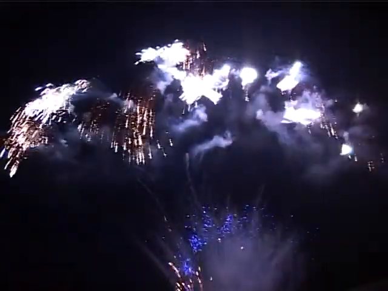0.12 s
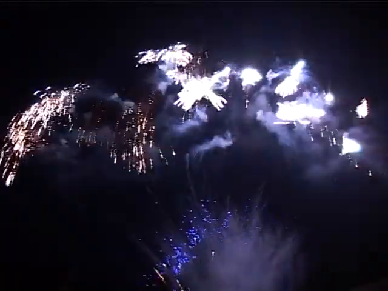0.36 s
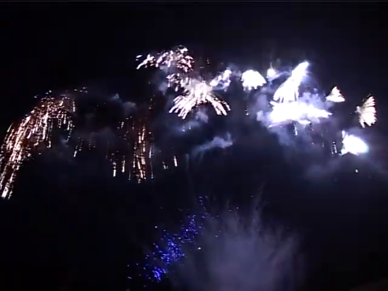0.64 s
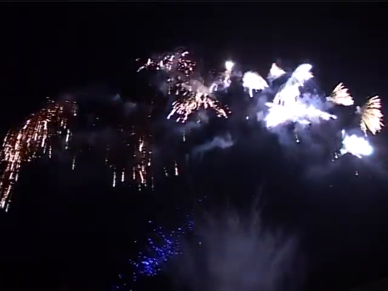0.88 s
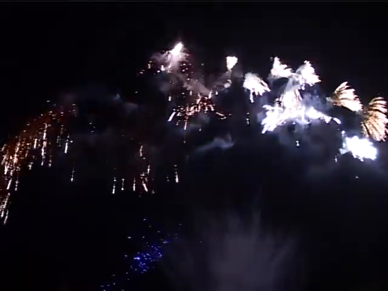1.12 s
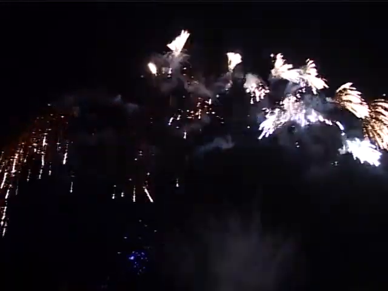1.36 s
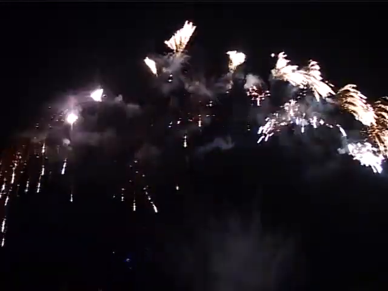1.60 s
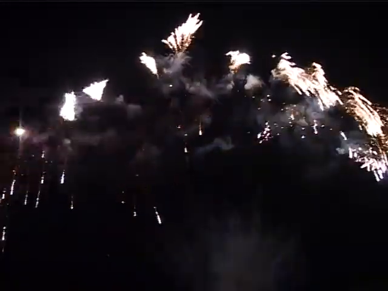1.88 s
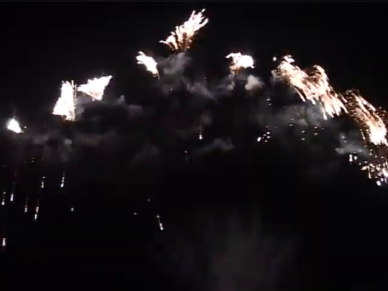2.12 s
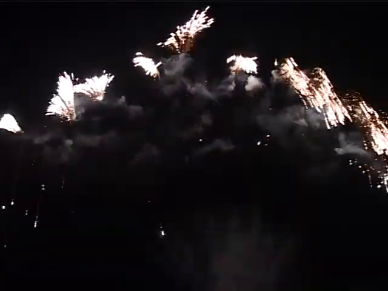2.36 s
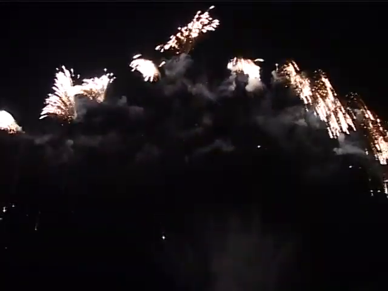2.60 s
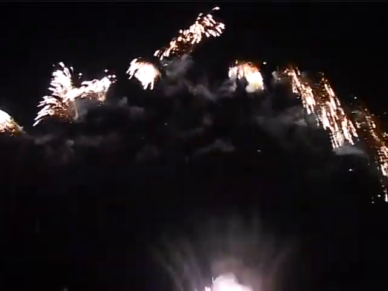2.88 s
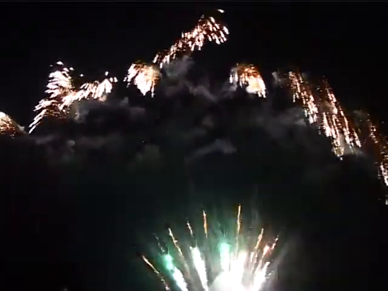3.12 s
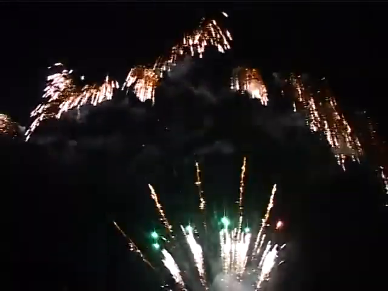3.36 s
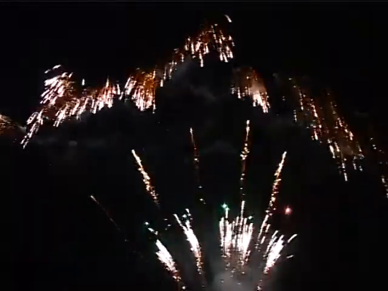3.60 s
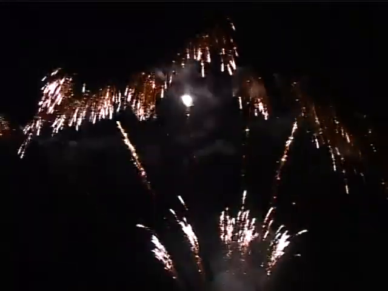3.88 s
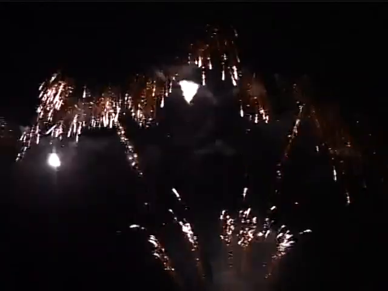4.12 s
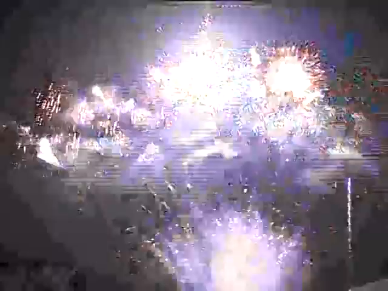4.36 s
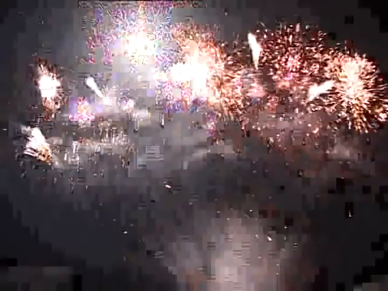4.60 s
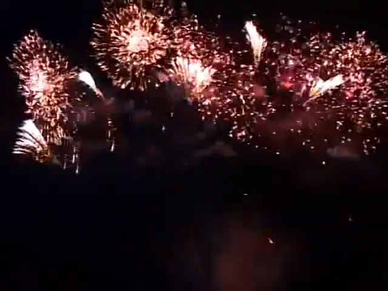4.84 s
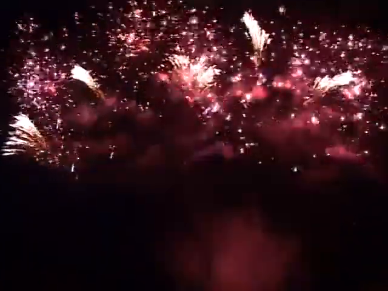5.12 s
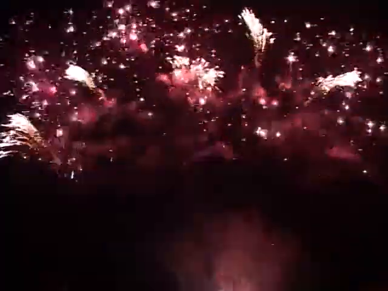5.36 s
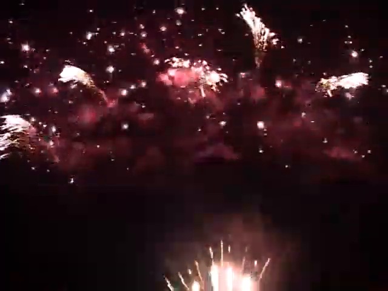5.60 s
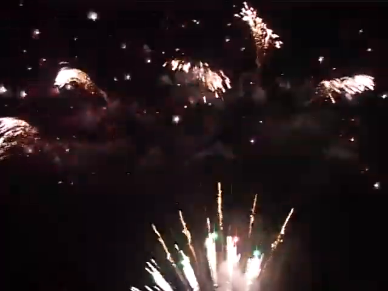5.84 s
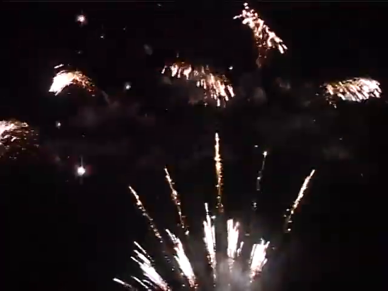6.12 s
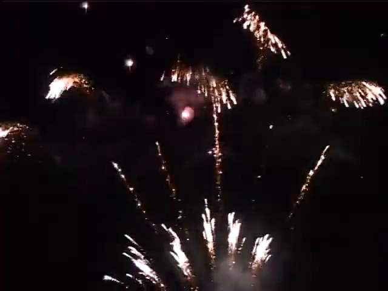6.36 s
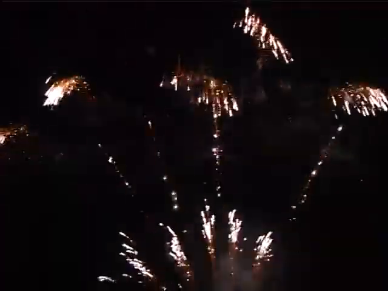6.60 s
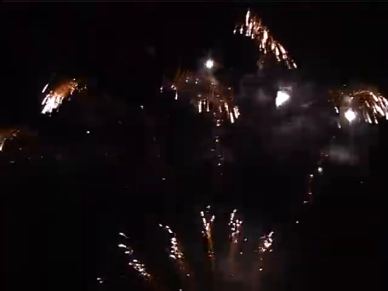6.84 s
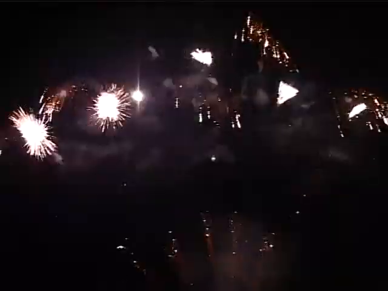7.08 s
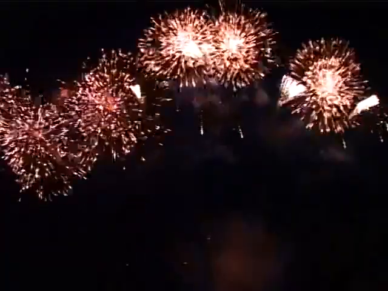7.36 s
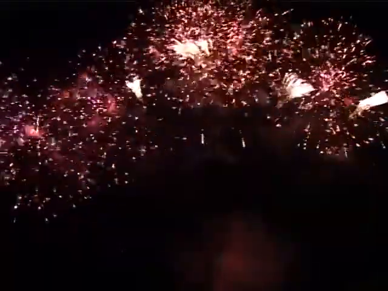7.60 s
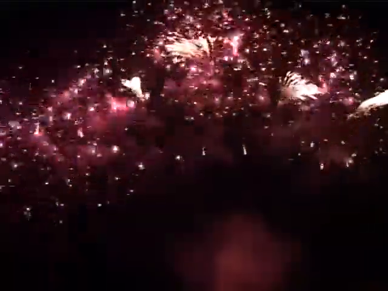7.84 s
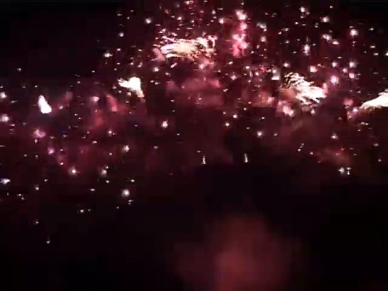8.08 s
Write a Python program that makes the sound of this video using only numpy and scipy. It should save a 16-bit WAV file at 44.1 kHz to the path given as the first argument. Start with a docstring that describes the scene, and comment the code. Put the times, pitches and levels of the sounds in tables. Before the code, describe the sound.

Firework cake outdoors fires boomy launch shots and, later, bursts of overloaded sharp explosions, thunderous echoes rolling between thin crackles and uneven hiss.

```python
"""A firework cake fires at night: single lift shots and two volleys leave the tubes, then clusters of salutes overhead
overload the input. Each bang is a damped pressure swing with a ground bounce, a near echo field and far rolling
returns, both made of filtered sparse noise. Small cracks and ragged pops, mostly in the air, sputter ahead of lifts
and an uneven hiss fill in around them. One capsule hears it all through a resonant housing."""
import sys
import numpy as np
from scipy import signal
from scipy.io import wavfile
from scipy.ndimage import uniform_filter1d, minimum_filter1d

SR = 44100
rng = np.random.default_rng(int(sys.argv[2]) if len(sys.argv) > 2 else 0)


def wav_record(signal):
    """Record a signal, one row per channel, as 16-bit PCM in the file named by sys.argv[1]."""
    frames = np.transpose(np.atleast_2d(signal))
    bounded = np.clip(frames, -1, 1)
    # unit amplitude maps onto the largest positive 16-bit level
    quanta = np.round(bounded * 32767).astype(np.int16)
    wavfile.write(sys.argv[1], SR, quanta)


def volts_from_decibels(level):
    """Turn decibel levels (scalar or array-like) into linear amplitude factors."""
    exponent = np.asarray(level, float) / 20
    return 10 ** exponent


N = 362502  # samples, about 8.2 s

# lift shots from the tubes: t/s, blast level/dB, near echo field level/dB, pitch factor of the ring
LIFT_SHOTS = [(-.052, -3.5, -26, 0.64), (0.1542, 2, -23, 0.88), (.3799, 3, -21.5, 0.81),
              (3.03, 5, -13.5, 0.95), (3.0366, 3, -19.5, 0.9), (3.0426, 0.5, -24, 0.92),
              (3.0562, -19, -20.5, 0.54), (5.6245, 4, -14.5, 1.01), (5.6398, -14, -19.5, 0.92),
              (5.648, -10, -18.5, 1.14), (5.6623, -18, -21, 1.01)]
# salutes overhead: t/s, blast level/dB, near echo field level/dB, delay of the ground bounce/ms
SALUTE_BURSTS = [(4.6184, 16.5, -9.5, 5), (4.738, -14, -17, 3.6), (4.7654, 19, -15.5, 4.7),
                 (4.7894, 14, -10, 4.5), (4.9253, 15.5, -11.5, 4.66), (4.9981, 15, -11.5, 6.2),
                 (7.3907, 27, -10, 4.36), (7.408, 11, -11, 4.52), (7.5494, 19.5, -13.5, 5.5),
                 (7.5625, 17, -14, 4.44), (7.5862, 9.5, -11, 6.3)]
# colour of the near echoes of salutes, cracks and pops: f/Hz, relative level/dB
BURST_ECHO_COLOUR = [(24, -54), (40, -20), (93, -7), (211, -1.5), (373, -2), (627, -13), (933, -8),
                     (1170, -19.5), (2170, -26.5), (2450, -26), (5850, -34.5), (6950, -41.5),
                     (11400, -42.5), (13600, -52), (15000, -114)]


def read(points, hz):
    """Joins a table by straight lines over log frequency."""
    f, value = np.transpose(points)
    return np.interp(np.log(hz + 1), np.log(f + 1), value)


def add(mix, s, sound):
    """Mixes a sound in at second s; what lies before the start is lost."""
    at = round(s * SR)
    part = mix[max(at, 0):max(at + len(sound), 0)]
    part += sound[max(-at, 0):][:len(part)]


def causal(db):
    """Minimum-phase filter taps for a gain given from zero to half the sample rate."""
    mirrored_db = np.r_[db, db[-2:0:-1]]
    log_gain = np.log(volts_from_decibels(np.maximum(mirrored_db, -100)))
    spectrum = np.exp(np.conj(signal.hilbert(log_gain)))
    return np.fft.ifft(spectrum).real[:len(db) // 2]


def colour(x, points):
    """Filters x by a spectrum, keeping the power of white noise."""
    taps = causal(read(points, np.fft.rfftfreq(8192, 1 / SR)))
    return signal.oaconvolve(x, taps / np.linalg.norm(taps))[:len(x)]


def swing(hz, start, cycles, rise_ms, slow_s=1):
    """A pressure jump, then suction and rebound: a damped cosine whose later swings stretch; start in radians."""
    t = np.arange(SR // 24) / SR
    turns = hz * slow_s * (1 - np.exp(-t / slow_s))
    rise = 1 - np.exp(-1000 * t / rise_ms)
    decay = np.exp(-hz * t / cycles)
    fade_out = 1 - (t / t[-1]) ** 4
    return rise * decay * fade_out * np.cos(2 * np.pi * turns + start)


def with_ground(mix, s, sound, echo_ms, echo_db, size=7):
    """The direct sound and its slightly duller bounce off the ground."""
    out = np.zeros(len(sound) + round(echo_ms * SR / 1000))
    add(out, 0, sound)
    smoothing = np.bartlett(size) * 2 / (size - 1)
    bounce = signal.lfilter(smoothing, 1, sound)
    add(out, echo_ms / 1000, volts_from_decibels(echo_db) * bounce)
    add(mix, s, out)
    return mix


def field(starts, levels_db, t60, build_s, echoes, taps_per_s, patchy_db):
    """Sparse reflections whose power builds after each bang and dies band by band."""
    hop = 128
    taps = rng.standard_normal(N) * (rng.random(N) < taps_per_s / SR)
    taps *= np.sqrt(SR / taps_per_s)
    hz, t, z = signal.stft(taps, SR, nperseg=4 * hop, noverlap=3 * hop)
    power = np.zeros(z.shape)
    slope_db = -60 / np.maximum(read(t60, hz), .1)[:, None]  # per second
    for s, db in zip(starts, levels_db):
        first = np.searchsorted(t, s + 0.002)
        age = t[first:] - s
        # echoes that stand out: quick to arrive, slower to fade
        late = [(np.maximum(age - delay, 0) / rise, lift) for delay, lift, rise in echoes]
        lumps_db = sum(lift * u * np.exp(1 - u) for u, lift in late)
        build = 1 - np.exp(-age / build_s)
        power[:, first:] += build * volts_from_decibels(2 * (db + lumps_db + slope_db * age))
    # uneven level, smoothed over time and then over frequency
    patches = uniform_filter1d(rng.standard_normal(z.shape), size=8, axis=1)
    patches = uniform_filter1d(patches, size=30, axis=0)
    z *= np.sqrt(power) * volts_from_decibels(patchy_db * patches / patches.std())
    return signal.istft(z, SR, nperseg=4 * hop, noverlap=3 * hop)[1][:N]


def night():
    """Burning stars hiss unevenly over the quiet of the night: steady sparse noise, coloured."""
    # colour of the hiss: f/Hz, relative level/dB
    hiss_colour = [(18, -38), (30, -3), (136, 7), (346, 0.5), (394, -2.5), (928, -2.5), (1440, -10),
                   (2770, -12.5), (3680, -15), (4200, -12), (6700, -23.5), (7830, -20), (9640, -24.5),
                   (13200, -30), (15000, -31)]
    # begun 5 s early, with almost no decay
    hiss = field([-5], [-56.5], [(1000, 1e4)], .1, [], taps_per_s=12000, patchy_db=1.0)
    return colour(hiss, hiss_colour)


def far_echoes():
    """Slow rolling returns from distant ground; an earlier shot still rolls at the start."""
    # decay of the far salute echoes: f/Hz, t60/s
    salute_far_decay = [(80, 5), (170, 4.9), (400, 7.86), (1000, 8.86), (3000, 5.04), (8000, 2.84)]
    # colour of the far salute echoes: f/Hz, relative level/dB
    salute_far_colour = [(24, -72), (40, -48), (76, -0.5), (227, 5), (355, -1.5), (554, -13), (956, -10.5),
                         (1290, -19.5), (2340, -24), (4560, -29.5), (6950, -36.5), (12300, -45),
                         (15000, -68)]
    # decay of the far shot echoes: f/Hz, t60/s
    shot_far_decay = [(80, 3.9), (170, 3.1), (400, 4.55), (1000, 3.94), (3000, 3.37), (8000, 3.3)]
    # colour of the far shot echoes: f/Hz, relative level/dB
    shot_far_colour = [(24, -58.5), (40, -21), (82, -16.5), (135, 2.5), (156, -4), (180, -19), (343, -9),
                       (514, -23), (869, -14.5), (1000, -21), (1500, -20), (4300, -32), (12000, -53.5),
                       (15600, -77), (22000, -120)]
    s, db = np.transpose(SALUTE_BURSTS)[[0, 2]]
    salute_roll = field(s, db - 16.0, salute_far_decay, 0.028, [], taps_per_s=8000, patchy_db=-1.0)
    rolling = colour(salute_roll, salute_far_colour)
    s, db = np.transpose([(-0.53, -6.5)] + [(row[0], row[2]) for row in LIFT_SHOTS])
    shot_roll = field(s, db - 24.5, shot_far_decay, .06, [], taps_per_s=9800, patchy_db=0.3)
    return rolling + colour(shot_roll, shot_far_colour)


def puff(noise, ms):
    """A few milliseconds of fizz: coloured noise that swells and dies."""
    # colour of the fizz: f/Hz, relative level/dB
    fizz_colour = [(120, -40), (200, -4.5), (946, -9.5), (1980, -18), (4310, -21), (7150, -35),
                   (11000, -40.5), (15000, -54)]
    u = 1000 * np.arange(len(noise)) / SR / max(ms, 1)
    return colour(noise, fizz_colour) * u ** 1.42 * np.exp(-1.8 * u ** 2) * 1.47


def sputter():
    """Quick match and escaping gas crackle ahead of the lifts, as short puffs of noise."""
    # sputter at the tubes: t/s, level/dB, length/ms
    sputter_puffs = [(0.1505, -13, 7), (3.0132, -16.5, 8.7), (3.0236, -9.5, 6.3), (5.61, -23, 5.9),
                     (5.618, -18, 6)]
    out = np.zeros(N)
    for (s, db, ms), noise in zip(sputter_puffs, rng.standard_normal((len(sputter_puffs), SR // 20))):
        add(out, s, volts_from_decibels(db) * puff(noise, ms))
    return out


def crack(hz):
    """A rounded shock: one deep dip between two small crests, with a thin snap."""
    u = np.arange(SR // 100) * hz / SR - 1  # in swings, zero at the dip
    dip = -np.cos(2 * np.pi * u - .25) * np.exp(-(u / .55) ** 2)
    snap = np.cos(2 * np.pi * 3.9 * (u + .4)) * np.exp(-((u + .3) / .3) ** 2)
    return dip + .14 * snap


def pops():
    """Clean cracks, and ragged puffs with a thump and a hollow knock; each bounces once, their echo field is faint."""
    # small clean cracks, mostly in the air, one just ahead of a volley: t/s, level/dB, swing f/Hz
    clean_cracks = [(1.095, -28, 960), (1.778, -41, 1000), (2.2330, -26.5, 925), (2.2489, -29, 920),
                    (3.013, -25, 1120), (4.5691, -26, 1260), (7.005, -31, 900), (7.2258, -35, 1000),
                    (7.344, -23, 1010)]
    # ragged pops, and at 0.054 s the echo of an earlier shot: t/s, level/dB, length/ms, knock f/Hz
    ragged_pops = [(0.028, -15.5, 3.7, 1700), (0.054, -12, 2.9, 729), (0.68, -23.5, 8.3, 870),
                   (0.994, -21.5, 6.4, 950), (1.01, -24.5, 5.1, 953), (1.344, -27.5, 4.8, 590),
                   (1.35, -20.5, 8.4, 875), (1.509, -29.5, 9.5, 765), (1.79, -20.5, 5.4, 610),
                   (1.923, -17, 6.2, 860), (2.254, -30.5, 4.8, 1150), (4.208, -17.5, 6, 950),
                   (4.392, -23, 5.5, 1660), (4.549, -22, 8.9, 880), (4.591, -22, 9.8, 760),
                   (7.023, -24, 5.9, 890), (7.207, -23, 5.6, 925), (7.237, -18, 6.4, 704),
                   (7.359, -33, 6.3, 870)]
    ground_ms, hollow = 4.9, 0.38  # hollow: share of the knock
    thump_db, thump_growth = 7.5, .6  # louder pops thump more (dB per dB)
    out = np.zeros(N)
    for s, db, hz in clean_cracks:
        with_ground(out, s, volts_from_decibels(db) * crack(hz), ground_ms, 0.46)
    for (s, db, ms, hz), noise in zip(ragged_pops, rng.standard_normal((len(ragged_pops), SR // 20))):
        fizz = puff(noise, ms)
        knock = signal.lfilter(*signal.iirpeak(hz, 3.5, SR), fizz)  # favours one pitch
        pop = (1 - hollow) * fizz + 2.2 * hollow * knock
        thump = swing(156, 2.8, cycles=0.73, rise_ms=0.39)
        add(pop, .0015, volts_from_decibels(thump_db + thump_growth * db) * thump)
        with_ground(out, s - .002, volts_from_decibels(db) * pop, ground_ms, -4)
    s, db = np.transpose([row[:2] for row in clean_cracks + ragged_pops])
    faint_decay = [(200, 0.22), (3000, 0.34)]  # f/Hz, t60/s
    faint = field(s, db - 21.5, faint_decay, 0.00082, [], taps_per_s=7300, patchy_db=1.5)
    return out + colour(faint, BURST_ECHO_COLOUR)


def bangs(rows, blast, echo_ms, echo_db, size, tint, t60, echoes):
    """Shock fronts with their ground bounce, and the near echo field that they raise."""
    out = np.zeros(N)
    for (s, db, *_), ms in zip(rows, echo_ms):
        with_ground(out, s, volts_from_decibels(db) * blast, ms, echo_db, size)
    s, field_db = np.transpose(rows)[[0, 2]]
    near = field(s, field_db, t60, 0.0013, echoes, taps_per_s=14000, patchy_db=1.5)
    return out + colour(near, tint)


def shots():
    """Lift charges: a second front leaves the tube mouth as the shell clears it; the box rings and booms."""
    # echoes that stand out of the near field: delay/s, lift over the field/dB, rise to the crest/s
    shot_echoes = [(0.011, 7.5, 0.0062), (0.1, 6.5, 0.0054)]
    # colour of the near echoes: f/Hz, relative level/dB
    shot_colour = [(24, -102), (40, -24.5), (122, 0), (169, -9), (244, -5.5), (401, -22), (454, -7),
                   (710, -19), (888, -13.5), (1650, -21.5), (2220, -21.5), (5700, -34.5), (6950, -44.5),
                   (11500, -54), (14000, -57), (15000, -75)]
    # decay of the near echoes: f/Hz, t60/s
    shot_decay = [(80, 1), (170, 0.96), (420, 0.78), (1100, 0.82), (3000, 0.8), (8000, 0.52), (14000, 0.52)]
    # hollow ring of tubes and box at pitch factor 1: f/Hz, level relative to the blast/dB, t60/s
    tube_modes = [(109, -24.5, 0.1), (146.4, -8, 0.1), (256.3, -23.5, 0.19), (343, -16.5, 0.21),
                  (471.2, -17.5, 0.25)]
    # narrow boom that hangs on after a lift: f/Hz, relative level/dB
    boom_colour = [(50, -33), (95, -17.5), (135, 5.5), (160, 3), (230, -62)]
    blast = swing(320, 0.5, cycles=0.88, rise_ms=0.088)
    add(blast, .0026, .5 * swing(960, 0.23, cycles=0.57, rise_ms=0.073))
    ground_ms = [4.9] * len(LIFT_SHOTS)  # all tubes stand in one place
    out = bangs(LIFT_SHOTS, blast, ground_ms, -1.7, size=15, tint=shot_colour, t60=shot_decay,
                echoes=shot_echoes)
    t = np.arange(SR // 2) / SR
    chances = rng.random((len(LIFT_SHOTS), len(tube_modes), 2))
    for (s, db, _, pitch), chance in zip(LIFT_SHOTS, chances):
        ring = np.zeros(len(t))
        for (hz, level_db, t60), (a, b) in zip(tube_modes, chance):
            mode_hz = hz * pitch * (1 + 0.11 * (a - .5))
            ring += volts_from_decibels(level_db - 60 * t / t60) * np.sin(2 * np.pi * (mode_hz * t + b))
        add(out, s + 0.00318, volts_from_decibels(db) * ring * (1 - np.exp(-t / 0.0025)))
        add(out, s + 0.0026, volts_from_decibels(db - 13) * swing(85, -1, cycles=1.3, rise_ms=2.7))  # the ground shakes
        wall_thud = swing(130 * pitch, -0.69, cycles=2.5, rise_ms=1.3)
        add(out, s + .1, volts_from_decibels(db - 15.5) * wall_thud)  # dull, off a wall
    s = np.transpose(LIFT_SHOTS)[0]
    boom_db = np.full(len(s), -29)  # one boom level for every lift
    boom = field(s, boom_db, [(100, 1.16)], .03, [(.185, 3.5, 0.0037)], taps_per_s=600, patchy_db=3.5)
    return out + colour(boom, boom_colour)


def salutes():
    """Flash bursts overhead: a sharp stretching swing over a slow low push."""
    # echoes that stand out of the near field: delay/s, lift over the field/dB, rise to the crest/s
    salute_echoes = [(0.038, 1.1, 0.0011), (0.097, 4.1, 0.015), (0.152, 4.8, 0.068)]
    # decay of the near echoes: f/Hz, t60/s
    salute_decay = [(80, 0.85), (170, 1), (420, 0.99), (1100, 1), (3000, 1), (8000, 0.78), (14000, 0.48)]
    blast = swing(371, .22, cycles=.75, rise_ms=.03, slow_s=.008)
    add(blast, 0, volts_from_decibels(-26) * swing(46.6, -2.04, cycles=0.66, rise_ms=9))  # low push
    ground_ms = np.transpose(SALUTE_BURSTS)[3]
    return bangs(SALUTE_BURSTS, blast, ground_ms, -4.0, size=7, tint=BURST_ECHO_COLOUR, t60=salute_decay,
                 echoes=salute_echoes)


def scene():
    """One capsule feeds both channels."""
    mono = shots() + salutes() + far_echoes() + pops() + sputter() + night()
    return np.tile(mono, (2, 1))


def low_end_lean(x):
    """Around peaks above 0.85 the low end leans briefly to the left."""
    near_peak = -minimum_filter1d(-1. * (abs(x[0]) > .85), size=2400, origin=800)
    low_end = signal.lfilter(*signal.butter(2, 1500, fs=SR), x[0])
    lean = 0.029 * uniform_filter1d(near_peak, size=400) * low_end
    return x + [lean, -lean]


def band_limit(x):
    """A steep low-pass at the top of the band."""
    return signal.sosfilt(signal.butter(12, 16100, fs=SR, output="sos"), x)


def record(dry):
    """Housing colour, preamp overload, a coupling filter that makes the flat tops droop, then full scale."""
    # housing resonances of the microphone: f/Hz, half-width at 1/e of the dB gain/Hz, gain/dB
    housing_peaks = [(2420, 1094, 5.5), (4284, 680, 6), (5940, 890, 6), (7700, 200, 5), (9100, 230, 4.5),
                     (10800, 950, 1)]
    hz = np.fft.rfftfreq(2048, 1 / SR)
    housing = causal(sum(db * np.exp(-((hz - f) / w) ** 2) for f, w, db in housing_peaks))
    x = signal.oaconvolve(dry, housing[None], axes=1)[:, :N]
    x = np.clip(x, -.7, .82)  # lopsided overload
    x = signal.lfilter(*signal.butter(1, 92, "high", fs=SR), x)
    x = signal.lfilter(*signal.butter(8, 13800, fs=SR), x)
    finished = np.clip(low_end_lean(x), -1, 1)
    return band_limit(finished)


dry = scene()
out = record(dry)
wav_record(out)
```